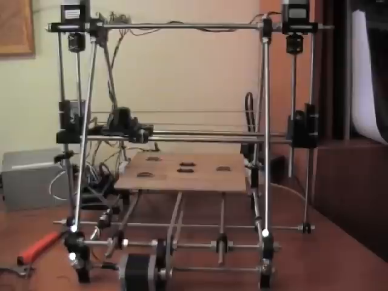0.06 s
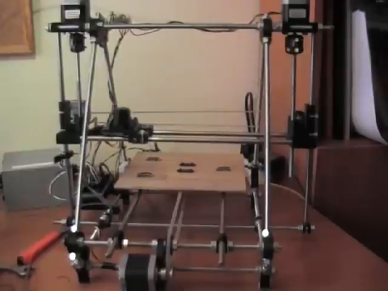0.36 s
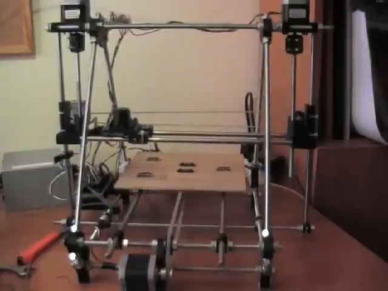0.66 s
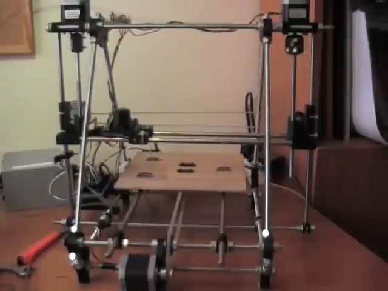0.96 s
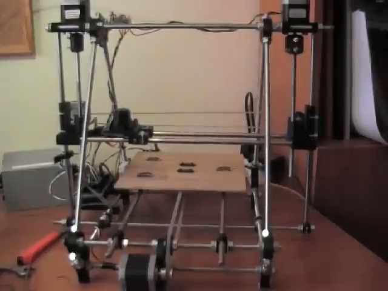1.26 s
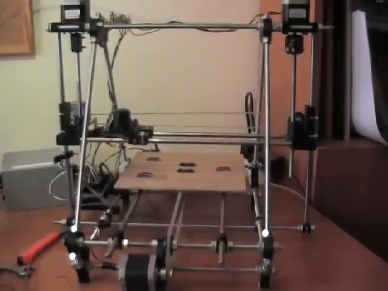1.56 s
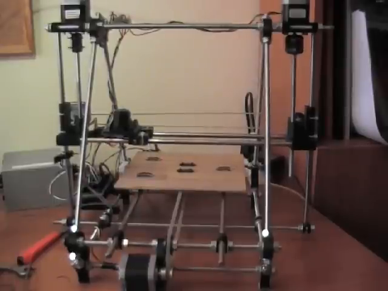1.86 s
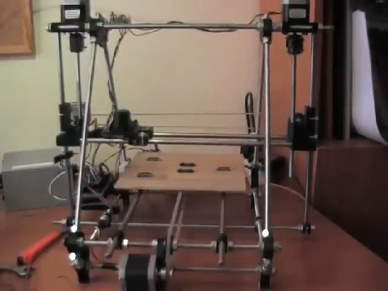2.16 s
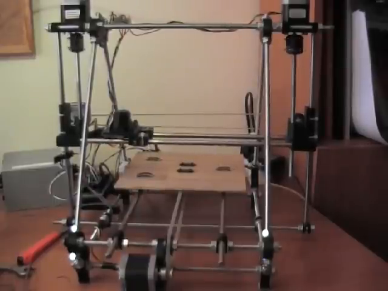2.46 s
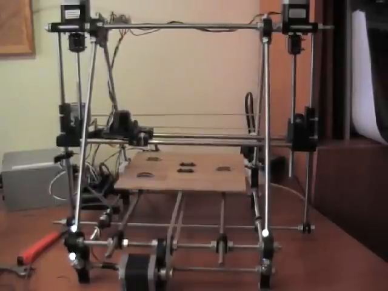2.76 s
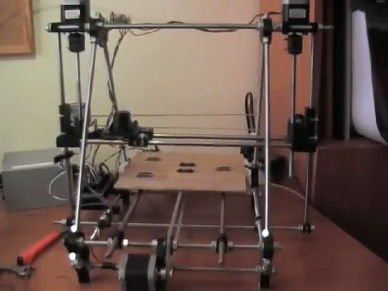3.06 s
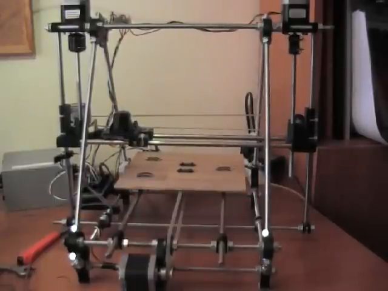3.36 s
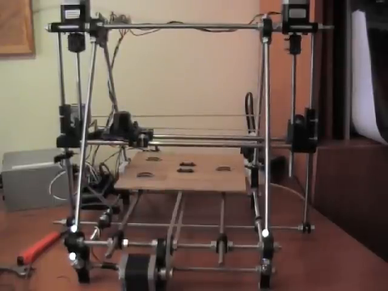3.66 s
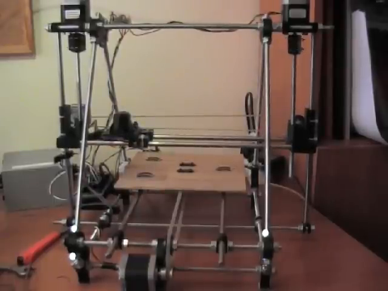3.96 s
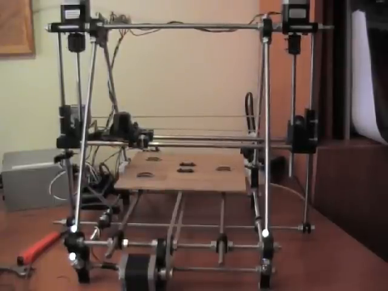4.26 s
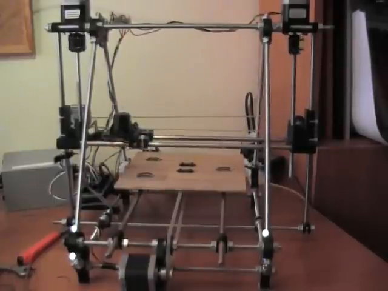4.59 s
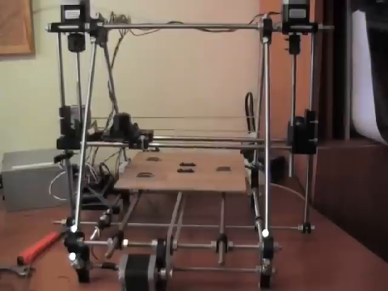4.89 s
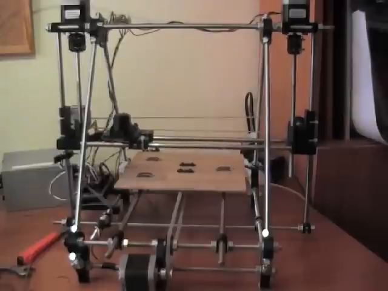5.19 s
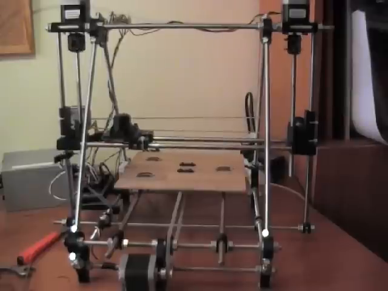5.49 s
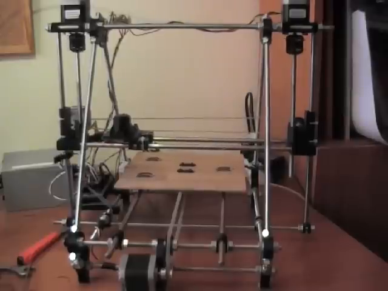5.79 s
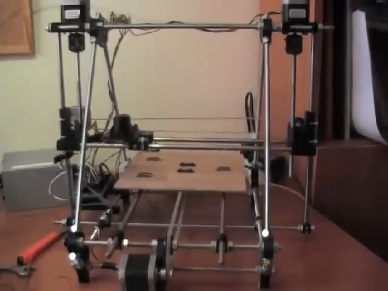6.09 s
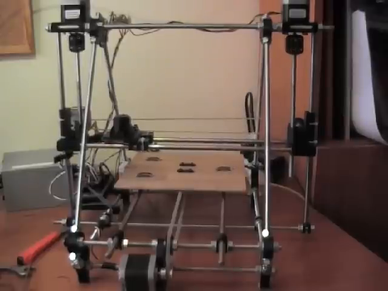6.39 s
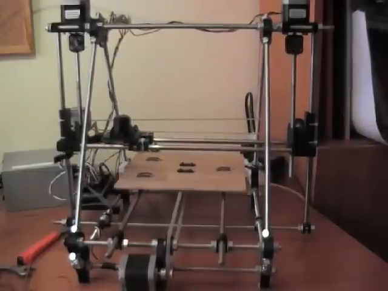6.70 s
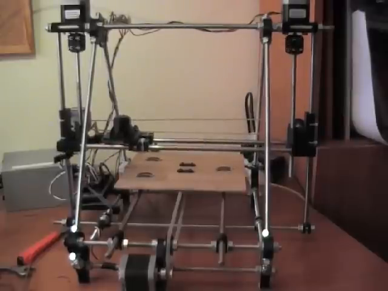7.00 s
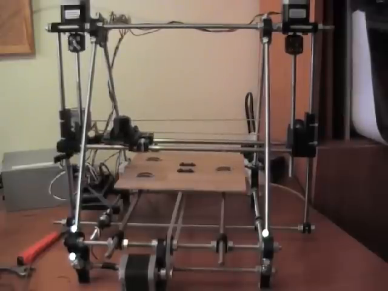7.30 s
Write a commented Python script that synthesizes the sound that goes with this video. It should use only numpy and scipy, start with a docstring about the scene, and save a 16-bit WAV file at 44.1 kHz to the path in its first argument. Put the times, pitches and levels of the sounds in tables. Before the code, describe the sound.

Two stepper motors of a small 3D printer hum at one low, steady pitch with a thin whine above. A few light ticks and one soft knock come early. Then the whine drops away for over a second and a lower buzz takes over, with faint scrapes of nuts on threads, before the whine returns. One microphone picks it up in a quiet room with soft hiss.

```python
"""A steady hum with a thin whine: two lead-screw stepper motors lower the gantry of a small 3D printer
at constant speed, on a desk in a quiet room. Their steps force the frame to vibrate at the step rate and
its harmonics. For a while the load shifts, the whine drops out and a lower buzz takes over. A few ticks
and one soft knock ring as damped modes, and nuts scrape faintly on their threads, over room noise,
mains hum and microphone hiss."""
import sys
import numpy as np
from scipy import signal
from scipy.fft import rfft, irfft
from scipy.io import wavfile

SR = 44100
rng = np.random.default_rng(int(sys.argv[2]) if len(sys.argv) > 2 else 0)


def transcribe(u):
    """Save the signal u as a 16-bit wav file named by the first command-line argument.

    u: samples, shape (n,) or (channels, n), limited to [-1, 1]; the rate is SR.
    q: integer samples, one column per channel.
    """
    v = np.clip(np.atleast_2d(u).T, -1, 1)
    q = np.round(v * 32767).astype(np.int16)
    wavfile.write(sys.argv[1], SR, q)


N = 328345
TIME = np.arange(N) / SR
TOP_HZ = 13270


def undb(db):
    """The decibel scale: 20 dB is a tenfold amplitude."""
    return 10 ** (np.asarray(db) / 20)


def walk(rate_hz):
    """Low-pass noise: a smooth random fluctuation with unit standard deviation."""
    hz = np.arange(N // 2 + 1) * SR / N
    drift = irfft(rfft(rng.standard_normal(N)) / (1 + (hz / rate_hz) ** 4), N)
    return (drift - drift.mean()) / drift.std()


def colour(noise, spectrum):
    """Spectral shaping by (frequency [Hz], relative level [dB]) points, scaled to unit rms."""
    hz, db = np.transpose(spectrum)
    bin_hz = np.maximum(np.arange(N // 2 + 1) * SR / N, 1)
    gain = undb(np.interp(np.log(bin_hz), np.log(hz), db))
    shaped = irfft(rfft(noise) * gain, N)
    return shaped / shaped.std()


def tone(cycles, rms_db, scatter_cycles=1):
    """Simple harmonic motion with a random phase offset."""
    offset = scatter_cycles * (rng.random() - .5)
    return np.sqrt(2) * undb(rms_db) * np.cos(2 * np.pi * (cycles + offset))


def ramp(start_s, length_s):
    """A linear transition from 0 to 1."""
    return np.clip((TIME - start_s) / length_s, 0, 1)


def motor_load(hum_db=-34.5, whine_db=-59.7, shift_whine_db=-14.5):
    """Mechanical loading: the gantry's weight shifts on the screws, weakens the whine and settles back."""
    # slow lulls and swells: (time [s], half width [s], hum change [dB], whine change [dB])
    swells = [(.85, 0.92, -0.2, -13), (1.97, .09, 0.8, 0), (2.14, 0.18, 0.5, 1), (2.93, .56, -2.5, 2)]
    shift = ramp(2.21, length_s=0.14) - ramp(3.49, length_s=0.21)
    whine_db += shift_whine_db * shift
    for centre_s, width_s, hum_change_db, whine_change_db in swells:
        swell = np.exp(-((TIME - centre_s) / width_s) ** 2)
        hum_db += hum_change_db * swell
        whine_db += whine_change_db * swell
    return shift, hum_db, whine_db


def motors(step_hz=160.03, microsteps=8, throb_hz=6.4):
    """Forced vibration: each step tugs at the frame, which scatters the higher harmonics in phase."""
    # overtones: (multiple of the step rate, level [dB], change under shifted load [dB], waver [dB])
    overtones = [(2, -50.5, 0, 0.94), (3, -57, 0.5, 0.5), (4, -73, -2, 3), (5, -67.5, 3.5, 1),
                 (6, -78.5, 9, 0.5), (7, -79.5, -7, 3), (10, -68, -6, 1), (12, -80.5, 4, 1),
                 (14, -83.5, 0, 3), (32, -80.5, 2.5, 1)]
    shift, hum_db, whine_db = motor_load()
    # the rotors lag a little as the friction varies
    steps = step_hz * TIME + rng.random() + 0.004 * walk(2.9) + 0.002 * walk(25)
    # the turning screws load the motors unevenly, so the hum throbs slightly
    throb_db = 0.46 * np.cos(2 * np.pi * throb_hz * (TIME - .06))
    hum = tone(steps, hum_db + throb_db, scatter_cycles=0)
    for multiple, db, shift_db, waver_db in overtones:
        level_db = db + shift_db * shift + waver_db * walk(6.2)
        hum += tone(multiple * steps, level_db, scatter_cycles=0.081 * multiple)
    whine = tone(microsteps * steps, whine_db + 0.26 * walk(6))
    return hum + whine


def room(noise_db=-51.5, swell_db=0.13):
    """Superposition: a continuous spectrum of rumble and hiss, with lines of mains hum and thin tones."""
    # room noise and microphone hiss: (frequency [Hz], relative spectral density [dB])
    spectrum = [(15, 11.5), (30, 12.5), (60, 5), (110, 1.5), (250, -0.5), (450, -3), (700, -5.5),
                (1300, -9), (2200, -12.5), (3200, -15), (5500, -18.5), (9000, -20), (10500, -21),
                (13000, -25)]
    # steady electrical tones: (frequency [Hz], level [dB])
    tones = [(50, -56), (205.5, -68.5), (3000, -80), (5200, -87.5), (6000, -86), (10401, -93)]
    noise = colour(rng.standard_normal(N), spectrum) * undb(noise_db + swell_db * walk(4.3))
    return noise + sum(tone(hz * TIME, db) for hz, db in tones)


def ring(start_s, modes):
    """Free vibration: struck modes (frequency [Hz], level [dB], t60 [s]) decay exponentially."""
    out = np.zeros(N)
    first = int(start_s * SR)
    t = TIME[:min(SR // 2, N - first)]
    for hz, db, t60 in modes:
        if hz < TOP_HZ:
            decay = np.exp(-np.log(1000) * t / t60)
            out[first:first + len(t)] += undb(db) * np.sin(2 * np.pi * hz * t) * decay
    return out


def ticks(corner_ratio=0.54, top_hz=9500):
    """Impulse response: a small part of the frame slips and rings, radiating little below its lowest mode."""
    # slips, each with its lowest mode: (time [s], level [dB], frequency [Hz], t60 [s])
    slips = [(.567, -47, 2000, .003), (.5785, -45, 2200, .003), (0.6076, -38, 2500, .004),
             (.613, -38, 2600, 0.002), (.6178, -40, 2210, 0.0025), (0.6322, -35.5, 4600, 0.0074),
             (1.168, -24.5, 2520, 0.0027), (1.1696, -37.5, 1780, .008), (1.3622, -40, 3400, .005),
             (5.904, -44, 1100, .007), (6.094, -42.5, 2100, .006)]
    # modes relative to the lowest: (frequency ratio, level [dB], t60 ratio)
    tick_modes = [(1, 0, 1), (1.82, -13.5, 1.8), (3.58, -12.5, 1.7)]
    out = np.zeros(N)
    for start_s, db, hz, t60 in slips:
        modes = [(hz * ratio, db + mode_db, t60 * hold) for ratio, mode_db, hold in tick_modes]
        radiation = signal.butter(4, [corner_ratio * hz, top_hz], "bandpass", fs=SR, output="sos")
        out += signal.sosfilt(radiation, ring(start_s, modes) + 1e-18)
    return out


def knock(start_s=1.3613, level_db=-32.5):
    """Modal damping: the upper modes of a dull bump die quickly and leave a short low swing."""
    # modes of the knock: (frequency [Hz], relative level [dB], t60 [s])
    modes = [(22, -3, 0.18), (64.5, -4, 0.063), (142, 13, 0.0065), (550, -5, 0.015), (950, -7, 0.015),
             (1370, -5, 0.011)]
    return ring(start_s, [(hz, level_db + db, t60) for hz, db, t60 in modes])


def scrapes(grain_db=3):
    """Sliding friction: nuts rub on the threads in short runs of uneven grains."""
    # bell-shaped bursts of rubbing: (time [s], half width [s], level [dB])
    rubs = [(2.231, 0.013, -53), (2.256, .012, -54), (2.311, 0.022, -56), (2.329, 0.013, -52.5),
            (3.376, .018, -53), (3.399, 0.026, -51.5), (3.442, 0.059, -59.5), (5.903, .01, -52.5),
            (6.095, .012, -55)]
    # friction noise: (frequency [Hz], relative spectral density [dB])
    spectrum = [(300, -15), (700, -5), (1100, 5), (1600, -0.5), (2400, -3.5), (3600, -16.5), (8000, -16.5),
                (13000, -32)]
    envelope = sum(undb(db) * np.exp(-2 * ((TIME - at) / width) ** 2) for at, width, db in rubs)
    grains = rng.standard_normal(N) * undb(grain_db * walk(360))
    return envelope * colour(grains, spectrum)


def scene():
    """Sound pressures from the printer and its room add at one microphone."""
    return (motors() + ticks() + knock() + scrapes() + room())[None]


def record(dry, dc_offset=.0386):
    """Band limiting: a steep low-pass cuts the top treble, and a small constant offset is added."""
    low_pass = signal.ellip(12, .1, 80, TOP_HZ, fs=SR, output="sos")
    return signal.sosfilt(low_pass, dry) + dc_offset


dry = scene()
out = record(dry)
transcribe(out)
```